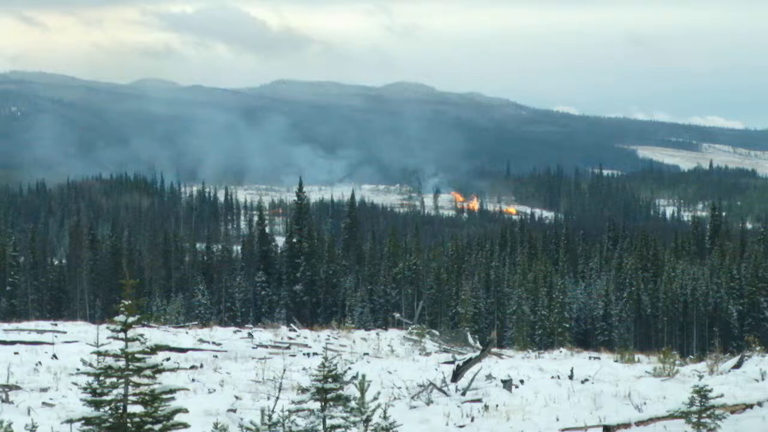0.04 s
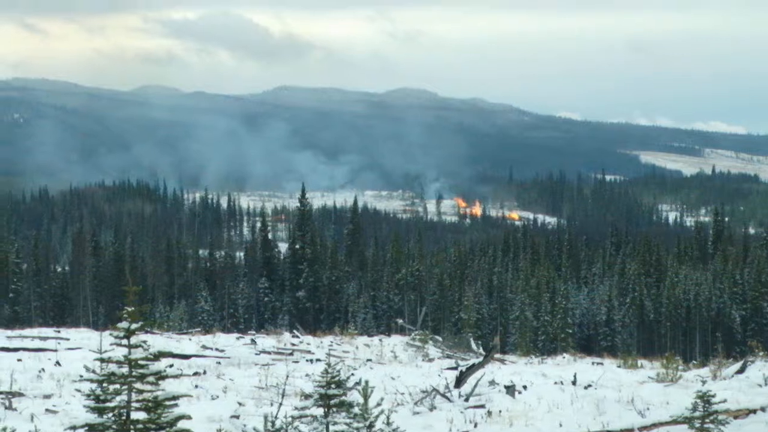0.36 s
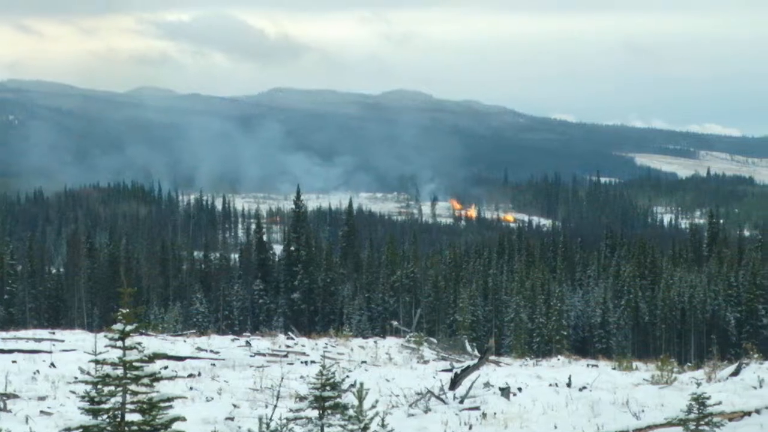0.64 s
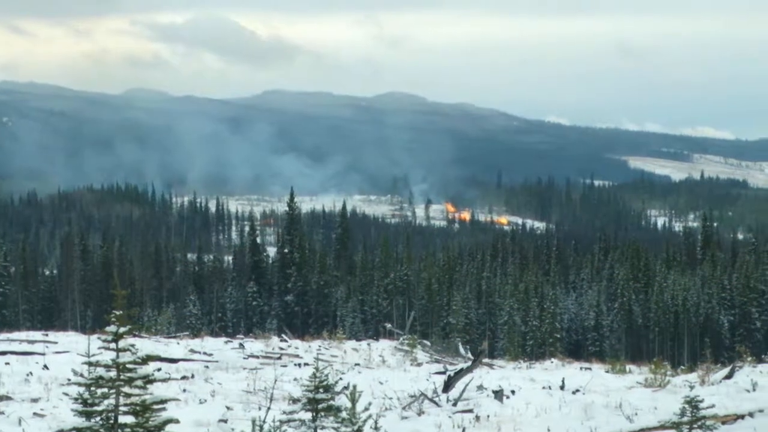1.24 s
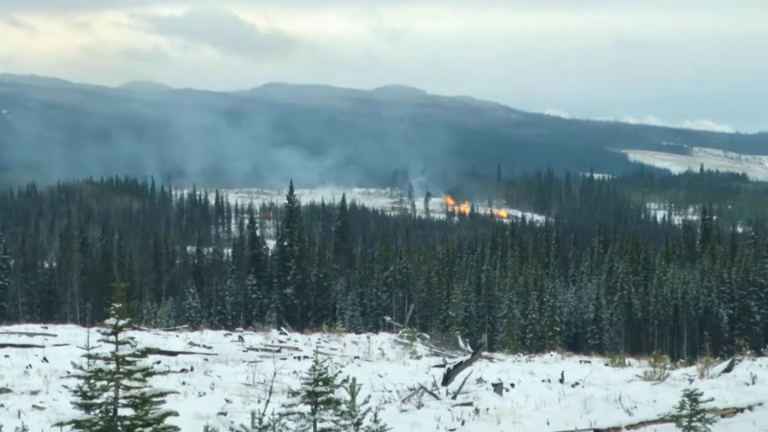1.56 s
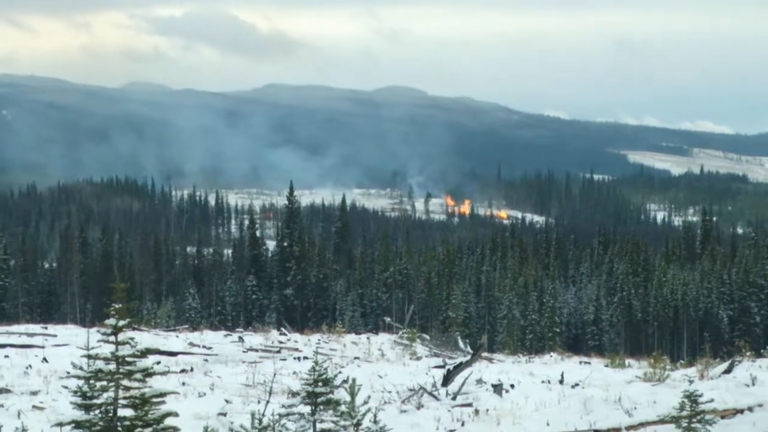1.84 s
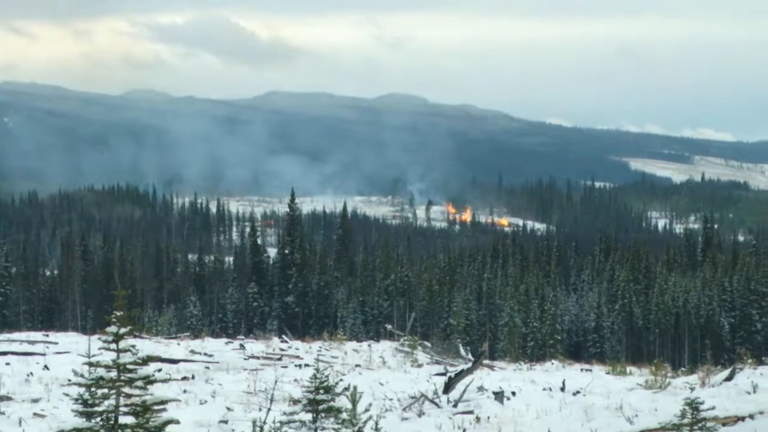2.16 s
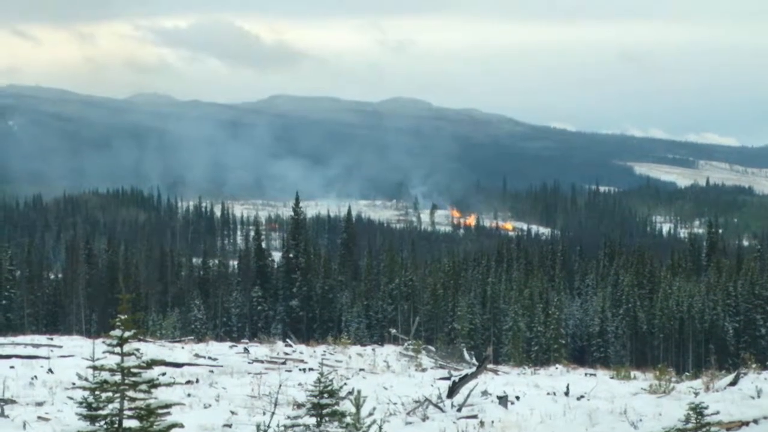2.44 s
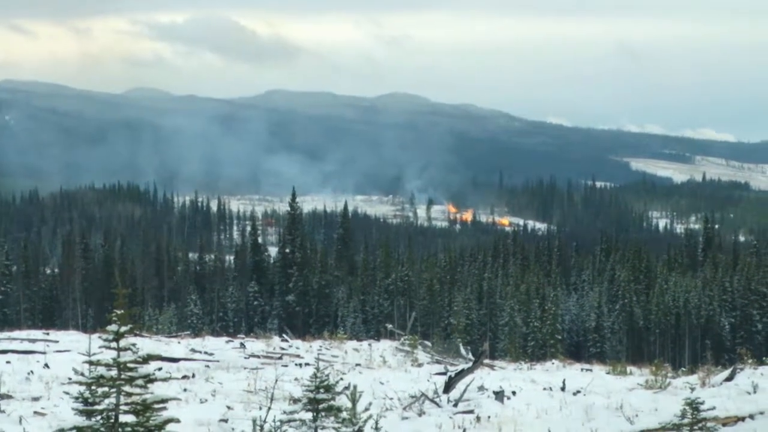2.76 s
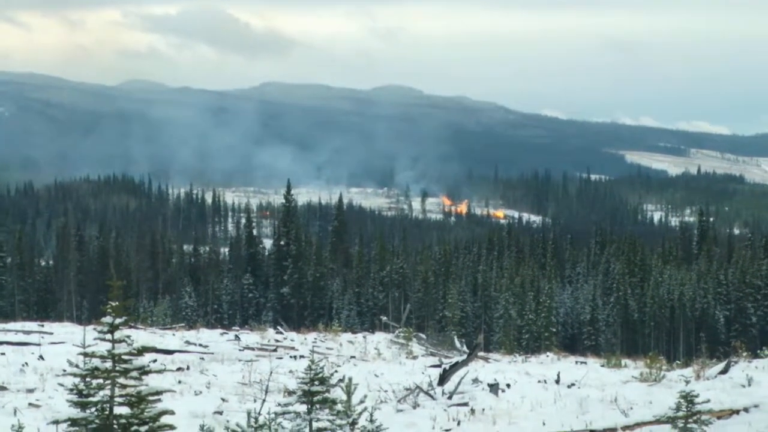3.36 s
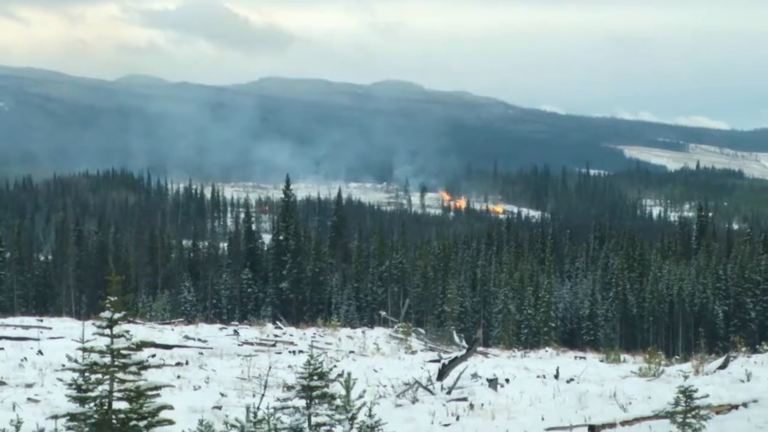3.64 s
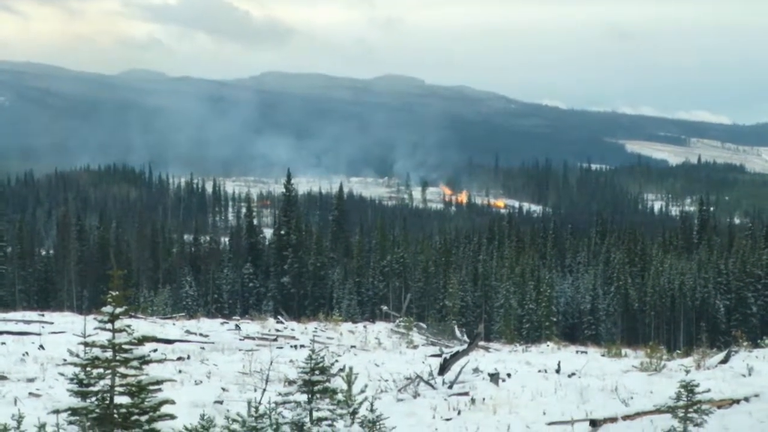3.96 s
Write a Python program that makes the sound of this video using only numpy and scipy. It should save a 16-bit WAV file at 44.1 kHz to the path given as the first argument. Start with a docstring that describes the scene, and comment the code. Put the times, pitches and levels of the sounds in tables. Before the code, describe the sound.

An engine idles close to the microphone in open snowy country, a deep, slightly uneven throb under a steady mechanical rush and buzz. Faint handling ticks come now and then, with a brief plastic creak just past halfway.

```python
"""A camera starts, and the sound of open, snowy country fades in at 0.1 s. From then on an eight-cylinder
engine idles close by: its periodic firings give a deep exhaust throb, made slightly uneven by unequal
cylinders, over a broadband mechanical rush and the harmonic buzz of a small motor at constant speed.
From 0.4 s light touches excite the resonances of the camera's casing as faint, sparse ticks.
Between 2.3 and 2.6 s the casing slips and creaks four times; the last tick follows at 3.6 s."""
import sys
import numpy as np
from scipy import signal
from scipy.fft import rfft, irfft, next_fast_len
from scipy.io import wavfile
from scipy.ndimage import uniform_filter1d, map_coordinates

SR = 44100
rng = np.random.default_rng(int(sys.argv[2]) if len(sys.argv) > 2 else 0)


def inscribe(sig):
    """Save sig as 16-bit PCM at rate SR to the path in sys.argv[1].

    A 1-D sig is mono; a 2-D sig holds one channel per row.
    Samples are clipped to [-1, 1] before scaling.
    """
    pcm = np.round(np.clip(np.atleast_2d(sig).T, -1, 1) * 32767)
    wavfile.write(sys.argv[1], SR, pcm.astype(np.int16))


N = 176400


def amp(db):
    """Amplitude ratio of a level in decibels."""
    return 10 ** (np.asarray(db) / 20)

def unit(x):
    """Normalisation to rms 1."""
    return x / np.sqrt(np.mean(x ** 2) + 1e-20)

def clock():
    """Uniform sampling: t/s of every sample."""
    return np.arange(N) / SR

def wobble(rate):
    """Smooth random modulation: a spline through `rate` Gaussian values a second."""
    return map_coordinates(rng.standard_normal(int(N * rate / SR) + 4), [clock() * rate])

def filtered(x, response):
    """Linear filtering: the spectrum is multiplied by a frequency response."""
    size = next_fast_len(N + SR // 2)
    return irfft(rfft(x, size) * response(np.fft.rfftfreq(size, 1 / SR)), size)[:N]

def noise(spectrum, patchy_db=0):
    """Spectral shaping of white noise to rms 1, with random gain in time-frequency patches."""
    bins = signal.stft(rng.standard_normal(N), nperseg=512)[2]
    patches = uniform_filter1d(rng.standard_normal(bins.shape), size=6, axis=0)
    patches = unit(uniform_filter1d(patches, size=12, axis=1))
    patchy = signal.istft(bins * amp(patchy_db * patches), nperseg=512)[1][:N]
    f, db = np.transpose(spectrum)
    def colour(hz):
        return amp(np.interp(np.log(hz + 1), np.log(f + 1), db, left=-120, right=-120))
    return unit(filtered(patchy, colour))

def resonance(hz, width_hz):
    """Friction noise of rms 1 in one Lorentzian resonance."""
    return unit(filtered(rng.standard_normal(N), lambda f: 1 / (1 + (2 * (f - hz) / width_hz) ** 2)))

def tone(turns, db):
    """A sinusoid from its phase in turns and its rms level."""
    return np.sqrt(2) * amp(db) * np.cos(2 * np.pi * turns)


CYCLE_HZ, CYLINDERS = 4.757, 8
FIRST_FIRING_S, STRONGEST_S, WANDER_S = 0.00659, 0.068, 0.0007

def engine():
    """Cyclic modulation: unequal cylinders make the exhaust swell and run early once a cycle."""
    t = clock() + WANDER_S * wobble(2.99)
    cycles = CYCLE_HZ * (t - FIRST_FIRING_S)
    lope = np.cos(2 * np.pi * CYCLE_HZ * (t - STRONGEST_S))
    early = np.cos(2 * np.pi * CYCLE_HZ * (t - STRONGEST_S + 0.0097))  # peaks just before the lope
    return exhaust_tones(cycles, lope, early) + exhaust_rumble(cycles, lope)


# Line spectrum of the exhaust: harmonic number of the engine cycle, rms level/dB
EXHAUST_HARMONICS = [(5, -38.5), (7, -48), (8, -22.5), (11, -49.5), (13, -43.5), (14, -45.5), (16, -30.5),
                     (18, -52), (19, -50), (24, -42), (27, -54.5), (32, -52.5), (36, -49), (39, -48.5),
                     (41, -55.5)]
FIRING_SWAY_DB, UNEVEN_SWAY_DB = 0.2, 1.74
SILENCER_LAG_TURNS, LOPE_TURNS, LOPE_DB = 0.11, 0.07, 3

def exhaust_tones(cycles, lope, early):
    """Fourier series: the firings give every eighth harmonic, unequal cylinders those in between."""
    out = np.zeros(N)
    for harmonic, db in EXHAUST_HARMONICS:
        k = round(harmonic)
        if k % CYLINDERS:
            out += tone(k * cycles + rng.random(), db + UNEVEN_SWAY_DB * wobble(3.91))
        else:
            overtone = k // CYLINDERS - 1  # 0 at the firing rate
            turns = k * cycles - SILENCER_LAG_TURNS * overtone ** 2 + LOPE_TURNS * overtone * early
            swell_db = LOPE_DB * min(overtone, 1) * lope
            out += tone(turns, db + swell_db + FIRING_SWAY_DB * wobble(9.7))
    return out


# Continuous spectrum of the exhaust: f/Hz, relative spectral level/dB
RUMBLE_SPECTRUM = [(8, -31.5), (16, -5.5), (24, -0.5), (30, -3.5), (46, -1.5), (56, 1.5), (78, 1),
                   (98, -7.5), (116, -1), (135, -10), (155, -7), (176, -3), (205, -9), (270, -10),
                   (330, -13), (420, -26), (800, -49.5)]
RUMBLE_DB, RUMBLE_SWAY_DB, LOPE_DEPTH, THROB_DEPTH = -35, 1.07, 0.14, 0.087

def exhaust_rumble(cycles, lope):
    """Amplitude modulation: low exhaust noise pulses once a cycle and once a firing."""
    pulsing = 1 + LOPE_DEPTH * lope + THROB_DEPTH * np.sin(2 * np.pi * CYLINDERS * cycles)
    return amp(RUMBLE_DB + RUMBLE_SWAY_DB * wobble(15)) * pulsing * noise(RUMBLE_SPECTRUM)


# Continuous spectrum of the machinery: f/Hz, relative spectral level/dB
RUSH_SPECTRUM = [(120, -20.5), (300, -2), (420, 0.5), (500, -.5), (620, -3), (860, -2), (1030, -8.5),
                 (1450, -13.5), (2000, -17.5), (2700, -19.5), (3200, -22.5), (4100, -26), (4900, -29),
                 (5400, -31.5), (6000, -32.5), (6350, -31.3), (6800, -37), (7200, -35.5), (7600, -39),
                 (8200, -38.5), (9200, -43), (10150, -43.5), (10700, -47), (16000, -58)]
RUSH_DB, RUSH_SWAY_DB = -49, 0.03

def machinery_rush():
    """Moving air and machinery radiate nearly stationary broadband noise."""
    return amp(RUSH_DB + RUSH_SWAY_DB * wobble(9.6)) * noise(RUSH_SPECTRUM, patchy_db=0.24)


# Line spectrum of the small motor: harmonic number of the rotation rate, rms level/dB
BUZZ_HARMONICS = [(4, -48), (5, -56.5), (6, -61), (9, -62.5), (10, -63), (11, -63.5), (12, -65),
                  (13, -58.5), (14, -70), (15, -61), (16, -69), (18, -70), (20, -65.5), (21, -72),
                  (22, -69.5), (23, -72.5), (24, -72), (25, -79.5), (26, -76)]
MOTOR_HZ, BUZZ_SWAY_DB = 54.142, 1.1

def motor_buzz():
    """Steady rotation gives a harmonic series; each partial wavers slightly in phase and level."""
    t, out = clock(), np.zeros(N)
    for harmonic, db in BUZZ_HARMONICS:
        turns = round(harmonic) * MOTOR_HZ * t + rng.random() + 0.04 * wobble(4)
        out += tone(turns, db + BUZZ_SWAY_DB * wobble(3.91))
    return out


# Modes of the motor's housing: f/Hz, relative level/dB, T60/s
HOUSING_MODES = [(1731, -2.5, 0.052), (1970, 0.5, 0.034), (2580, 0.5, 0.043), (2818, -4, .04),
                 (3300, -17, 0.028), (4100, -13.5, 0.034)]
TAP_DB, TAP_SCATTER_DB, TAP_ATTACK_S = -60, 2.5, 0.00034

def motor_taps():
    """Convolution: one tap a turn excites the impulse response of the housing's damped modes."""
    starts = (np.arange(int(N / SR * MOTOR_HZ)) * SR / MOTOR_HZ).astype(int)
    strengths = amp(TAP_DB + TAP_SCATTER_DB * rng.standard_normal(len(starts)))
    taps = np.bincount(starts, strengths, N)
    age = clock()[:SR // 10]
    ring = sum(amp(db - 60 * age / t60) * np.sin(2 * np.pi * hz * age) for hz, db, t60 in HOUSING_MODES)
    attack = 1 - np.exp(-age / TAP_ATTACK_S)
    return signal.fftconvolve(taps, ring * attack)[:N]


# High partials of the motor: f/Hz, rms level/dB
WHINE_PARTIALS = [(6417, -96), (7827, -94), (8021, -94)]

def motor_whine():
    """Random phase modulation broadens each faint tone into a narrow band."""
    return sum(tone(hz * clock() + 0.34 * wobble(20), db) for hz, db in WHINE_PARTIALS)


# Slips of the casing: t/s, duration/s, low ring level/dB, high ring level/dB, low f/Hz, high f/Hz
CASING_SLIPS = [(2.3245, 0.0038, -52.5, -59.5, 3300, 5900), (2.388, .005, -70, -68, 2200, 5350),
                (2.4825, 0.007, -34, -58.5, 2110, 6350), (2.534, 0.0099, -55.5, -82, 2260, 6350)]
# Friction noise of a slip: f/Hz, relative spectral level/dB
GRIT_SPECTRUM = [(700, -14.5), (1400, 1), (2600, -4), (3300, -13), (4200, -28), (4900, -17), (5400, -28),
                 (7000, -41), (9300, -49), (10600, -28), (11600, -44), (12400, -40.5), (13800, -42),
                 (15500, -53)]
GRIT_DB, TAIL_DB = -11.5, -18.5  # relative to the low ring; to the main decay
SLIP_T60_S, TAIL_T60_S = 0.015, 0.065

def casing_creaks():
    """Stick-slip friction: each brief slip rings the plastic, which decays at two rates."""
    t, out = clock(), np.zeros(N)
    for start, duration, low_db, high_db, low_hz, high_hz in CASING_SLIPS:
        age = t - start
        swell = np.clip(age / (duration * 0.5) + 0.3, 0, 1)
        released = np.maximum(age - duration * 0.72, 0)
        decay = amp(-60 * released / SLIP_T60_S) + amp(TAIL_DB - 60 * released / TAIL_T60_S)
        low_ring = np.sin(2 * np.pi * (low_hz * age + 0.03 * wobble(500)))
        grit = amp(GRIT_DB) * noise(GRIT_SPECTRUM)
        high_ring = resonance(high_hz, width_hz=1000)
        out += swell * decay * (amp(low_db) * (low_ring + grit) + amp(high_db) * high_ring)
    return out


# Light touches on the casing: t/s, level/dB
TOUCHES = [(.387, -51.5), (.957, -56.5), (1.708, -52.5), (2.849, -57), (3.601, -51.5)]
# Resonances of the casing: f/Hz, bandwidth/Hz, relative level/dB
CASING_RESONANCES = [(2540, 380, 3.5), (4150, 800, -4.5), (4900, 1300, -12.5)]
TICK_ATTACK_S, TICK_T60_S = 0.002, 0.032

def casing_ticks():
    """Transient excitation: after each touch the casing's resonances decay exponentially."""
    t, envelope = clock(), np.zeros(N)
    for start, db in TOUCHES:
        attack = np.clip((t - start) / TICK_ATTACK_S, 0, 1)
        released = np.maximum(t - start - TICK_ATTACK_S, 0)
        envelope += attack * amp(db - 60 * released / TICK_T60_S)
    ring = sum(amp(db) * resonance(hz, width) for hz, width, db in CASING_RESONANCES)
    return envelope * unit(ring)


def scene():
    """Superposition in a free field: all sources add at one microphone, with no echo over the snow."""
    machines = engine() + machinery_rush() + motor_buzz() + motor_taps() + motor_whine()
    return (machines + casing_creaks() + casing_ticks())[None]


START_S, ONSET_S, FADE_S, START_GAIN = 0.098, 0.0011, 0.11, 0.28
CUTOFF_HZ, CUTOFF_ORDER = 15700, 80

def record(dry):
    """Gain ramp and band limiting: the sound fades in as the camera starts, through a steep low-pass."""
    age = clock() - START_S
    onset = np.clip(age / ONSET_S, 0, 1)
    fade = np.clip(START_GAIN + age / FADE_S * (1 - START_GAIN), 0, 1)
    return filtered(dry[0] * onset * fade, lambda hz: 1 / (1 + (hz / CUTOFF_HZ) ** CUTOFF_ORDER))[None]


dry = scene()
out = record(dry)
inscribe(out)
```